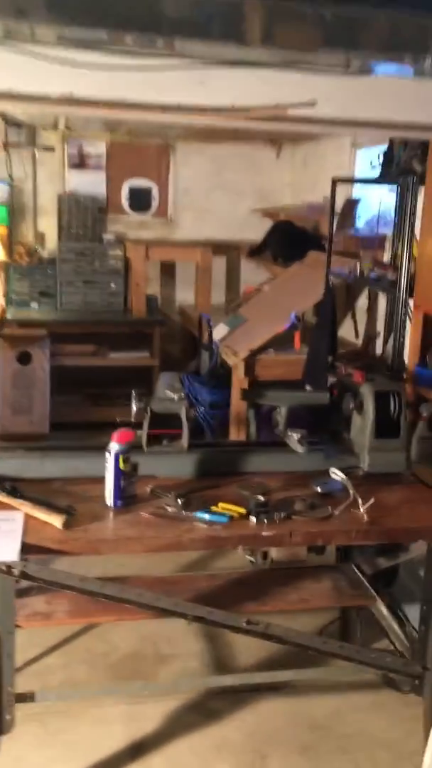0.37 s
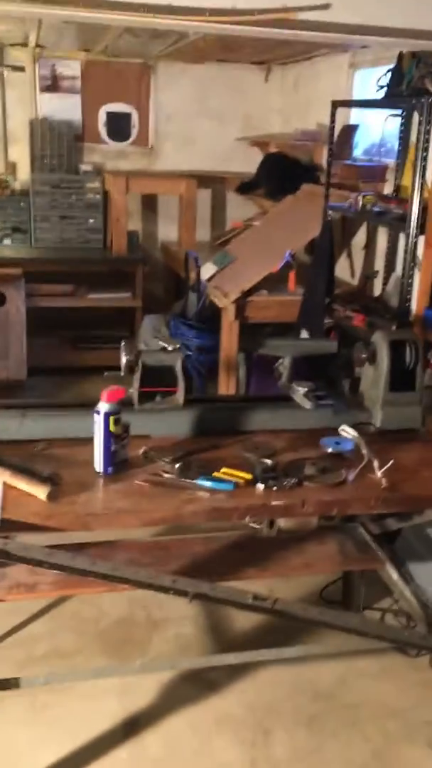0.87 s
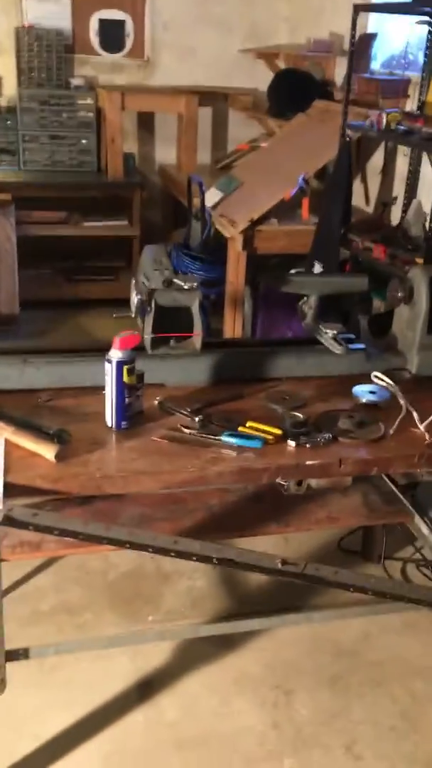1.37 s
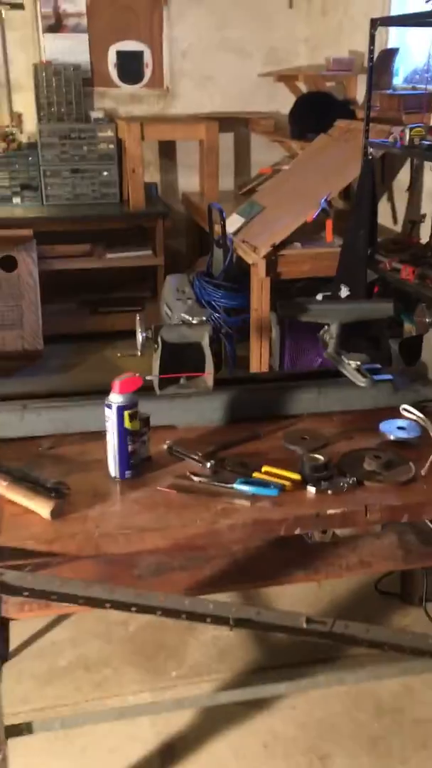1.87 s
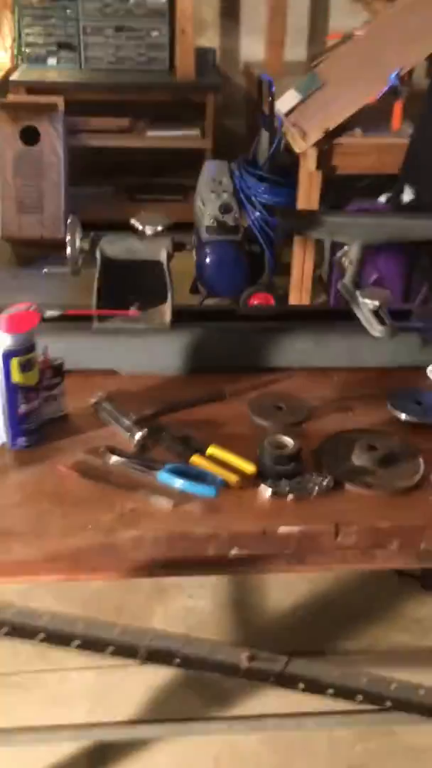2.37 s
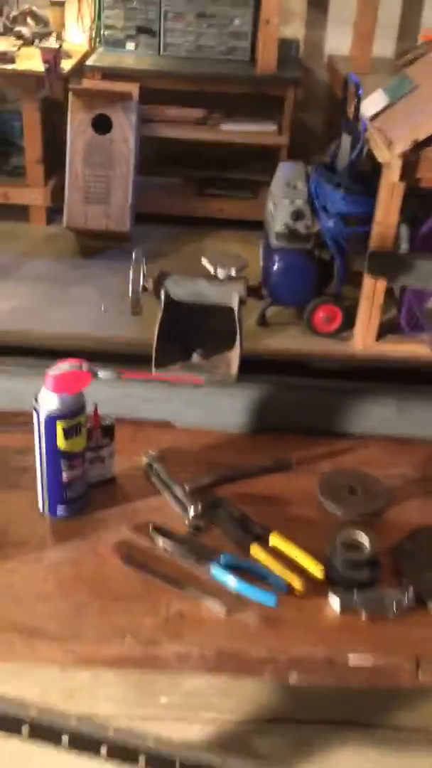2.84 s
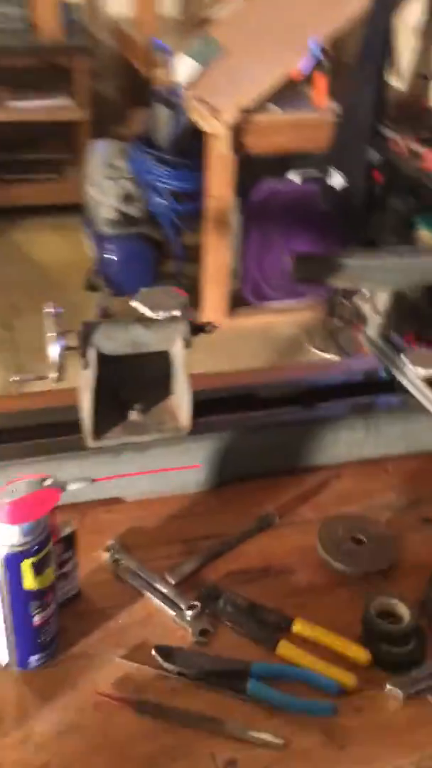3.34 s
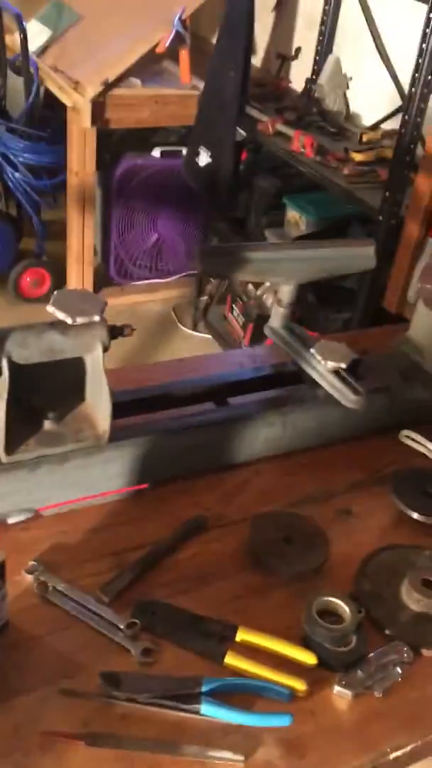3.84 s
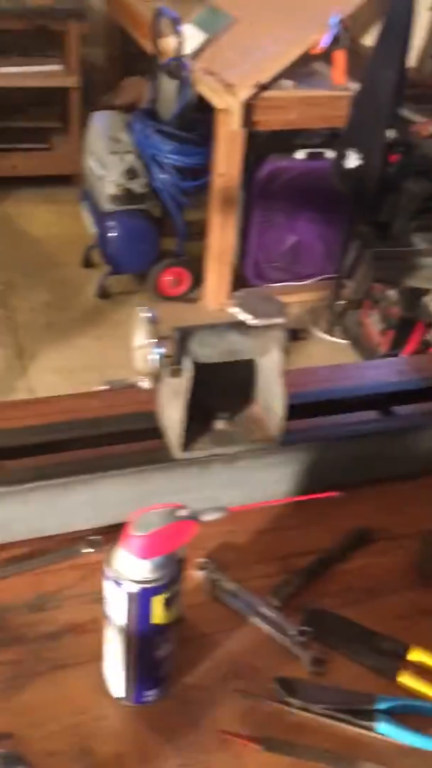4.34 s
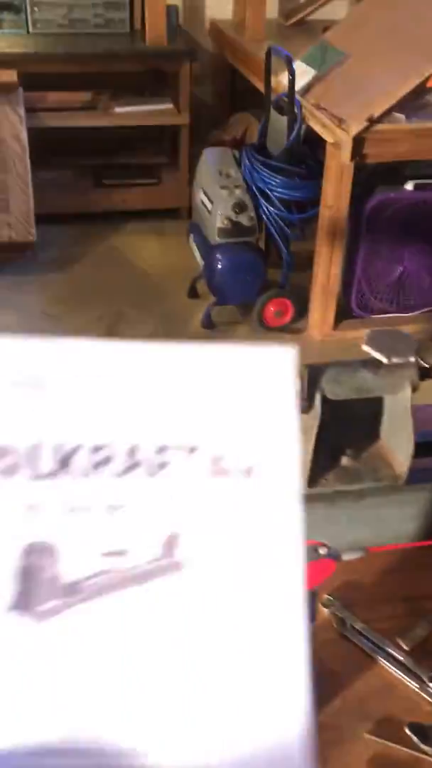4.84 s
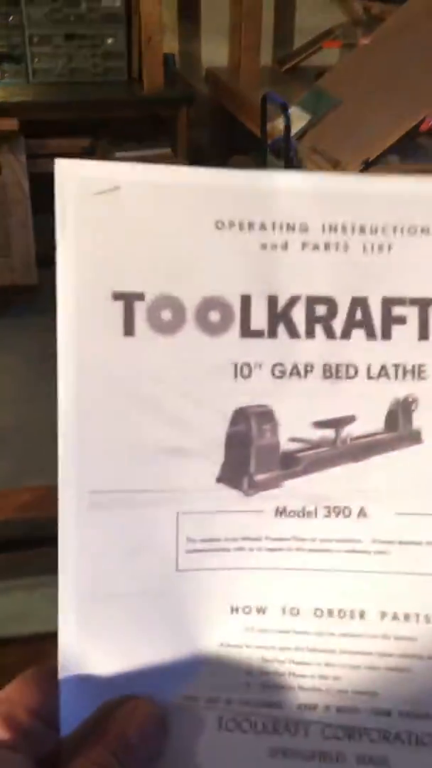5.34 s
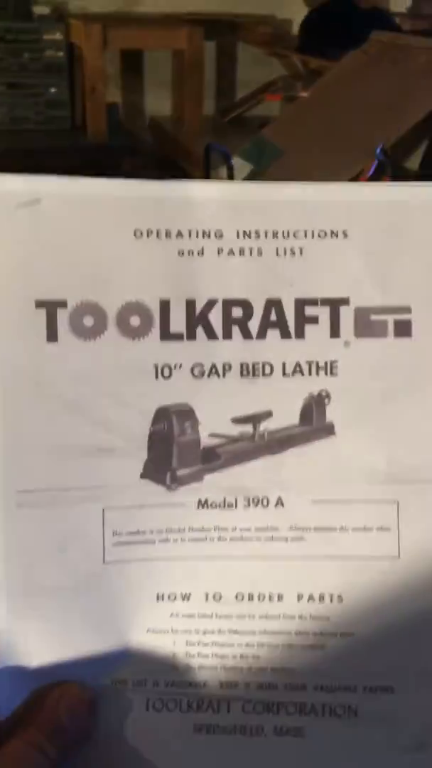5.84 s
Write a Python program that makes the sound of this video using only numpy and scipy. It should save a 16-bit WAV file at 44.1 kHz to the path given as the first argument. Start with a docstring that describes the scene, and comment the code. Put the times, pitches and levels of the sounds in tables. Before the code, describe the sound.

Close handheld microphone in a quiet workshop with short wall echoes. Faint hiss, low machine hum and a tiny rapid tick run throughout. A hand rubs and thumps softly, wood clatters briefly, then paper snaps and slides get busier, peaking in a sharp snap and hard bench knocks just after four seconds. Afterwards only a few light creases and snaps remain.

```python
"""A sheet flicks and a hand rubs the phone it holds, over microphone hiss and a machine behind the walls.
Someone walks through a quiet workshop, the phone in one hand and a few printed sheets in the other.
Fingers and heels thump, wood clatters, paper slides, snaps and creases, and blows ring a bench.
Shaped noise makes rubbing, paper and background; damped swings make snaps and thumps; decaying modes
make wood and bench. Paper, pops, wood and bench also reach the walls; hand, creases and tick stay close."""
import sys
import numpy as np
from scipy import signal
from scipy.fft import rfft, irfft
from scipy.io import wavfile
from scipy.ndimage import uniform_filter1d

SR = 44100
rng = np.random.default_rng(int(sys.argv[2]) if len(sys.argv) > 2 else 0)


def voltage_ratio(level):
    """Linear amplitude factor for a level in decibels (scalar or array-like)."""
    return 10 ** (np.asarray(level, float) / 20)


def wav_out(sig):
    """Save sig, one row per channel (or a flat mono array), as 16-bit PCM at SR to the path in sys.argv[1]."""
    wavfile.write(sys.argv[1], SR, np.round(np.clip(np.atleast_2d(sig).T, -1, 1) * 32767).astype(np.int16))


N = 262836
T = np.arange(N) / SR  # s

# All levels but the tick's are ahead of the microphone's colour; the tick joins after it.
# spectrum of the resting room and microphone: pitch_hz, relative level_db per Hz
STILL_SPECTRUM = [(20, -43), (30, -33), (45, 0.5), (60, 1.5), (87, -26.5), (190, -37), (300, -8),
                  (480, -57), (540, -14.5), (1040, -19.5), (2200, -22.5), (5100, -26), (9200, -29.5),
                  (13500, -30.5), (16000, -37)]
# resonances of the distant machine: pitch_hz, width_hz, level_db before wavering
MACHINE_DRONE = [(60.6, 5.2, -79.5), (270.3, 17, -72.5), (394.2, 13.8, -71.5), (1042, 54, -82)]
# grip rubbing of the hand on the phone: time_s, level_db
GRIP_LEVEL = [(0, -59.5), (.4, -59.5), (.51, -65), (1.3, -67.5), (1.8, -74), (2.0, -72), (2.27, -61.5),
              (2.62, -72.5), (3.13, -61.5), (3.4, -66), (4.0, -65), (4.2, -82), (4.35, -62), (4.8, -67.5),
              (5.37, -68.5), (5.63, -74.5), (5.96, -76.5)]
# low swells: jolts of the arm, and brief swellings of the machine's drone near 370 Hz:
# start_s, length_s, level_db before the swell, centre_khz, width_octaves
LOW_SWELLS = [(.16, 0.063, -48.5, 0.16, 1.58), (.17, 0.068, -46, 0.054, 1.6),
              (.72, 0.053, -54.5, 0.05, 0.72), (2.09, 0.057, -52, 0.055, 1.3), (2.13, 0.081, -58, 0.42, 2),
              (2.75, .03, -62, 0.36, 0.37), (2.9, 0.036, -59, 0.38, .51), (3.17, 0.021, -53, 0.374, 0.32),
              (4.17, 0.022, -49.5, 0.089, 1.2), (4.29, 0.032, -52, .068, 0.62),
              (4.37, 0.039, -66, 0.38, 1.1)]
# a sheet flicked, sudden and fading; columns as LOW_SWELLS
PAPER_FLICKS = [(0, 0.087, -68, 1.4, 4.9), (.94, 0.013, -62, 5.6, 2.7), (2.095, 0.035, -63.5, 1.3, 4.9),
                (2.919, 0.051, -66, 1.08, 2), (3.188, 0.041, -60.5, 2.8, 2.8),
                (3.228, 0.0094, -60, 1.5, 0.36), (3.412, 0.018, -55, 0.9, 1.56),
                (3.666, 0.0075, -58.5, 1.8, 0.83), (3.99, 0.014, -55.5, 10.2, .9),
                (4.071, 0.035, -55.5, 3, 4.4), (4.532, 0.014, -69.5, 5.9, 1.4),
                (5.44, 0.0073, -70, 11, 2.2)]
# sliding paper and cloth, swelling gently; the long row at 4.38 is a held sheet flexing near 1 kHz; columns as
# LOW_SWELLS
GENTLE_STROKES = [(.08, 0.11, -64.5, 1.1, 1.76), (.162, 0.078, -69.5, 1.1, 5.5),
                  (1.576, 0.1, -72.5, 5.9, 2.3), (2.167, 0.04, -65.5, 0.55, 4.3),
                  (2.225, 0.077, -61, 3.2, 1.64), (2.33, .045, -68.5, 1.53, 1.8),
                  (3.041, 0.27, -63, 0.74, 5), (3.265, 0.038, -60, 1.3, 4.4), (3.736, 0.069, -56, 2.2, 4.4),
                  (3.823, 0.029, -67, 4.9, 0.52), (3.919, 0.12, -60.5, 3.1, 3.2),
                  (4.1, .06, -59.5, 1.56, 1.24), (4.155, 0.058, -55, 3.8, 2.5),
                  (4.38, 0.88, -72.5, 0.97, 0.89), (4.58, 0.033, -70.5, 4.2, 1.9)]
# sheets pulled ever faster, then stopped dead; columns as LOW_SWELLS
PAPER_PULLS = [(4.2, 0.076, -54, 5.1, 1.63), (4.22, 0.062, -57, 9.8, 0.52), (4.23, 0.048, -49.5, 1.84, 1.8)]
# decay of the workshop's echoes: pitch_hz, t60_s
ROOM_DECAY = [(100, 0.35), (500, 0.24), (2000, 0.29), (6000, 0.31), (15000, 0.13)]
# runs of the tick from inside the phone, with one skip between them: first_s, last_s
TICK_TIMES = [(.0357, 1.7), (1.7628, 5.96)]
# treble bands of the tick: pitch_hz, width_hz, level_db while it sounds
TICK_BANDS = [(6060, 680, -71), (13000, 6500, -70.5)]
# snaps of a buckling sheet: start_s, peak_db, pitch_hz, length_cycles, room_db relative to the direct sound
PAPER_SNAPS = [(.317, -51, 2000, 1.5, 0), (.4393, -49, 1700, 2, -4), (.465, -52, 3000, 1.5, -2),
               (.5517, -42.5, 1900, 2.7, -27), (.944, -55, 13000, 2.7, -6), (1.7947, -50.5, 3300, 4.7, -7),
               (2.0936, -35.5, 1180, 1.17, -0.5), (2.6313, -27, 4650, 1.83, -3),
               (2.739, -38.5, 5170, 1.25, 1.5), (2.7727, -46, 1810, 1.3, -0.5),
               (2.9185, -45, 1700, 1.6, -20), (3.0517, -44.5, 1500, 2.4, 2.5),
               (3.1895, -43.5, 6400, 12, -6), (3.2293, -36, 1700, 1.6, 3), (3.4113, -37.5, 3300, 0.9, 2),
               (3.6705, -48.5, 1900, 2.3, 9), (3.7385, -45, 1220, 0.84, 8), (3.8653, -40, 5500, 0.96, -15),
               (3.886, -34, 4400, 0.63, -3.5), (3.998, -36, 4460, 1.8, 2), (4.0741, -22.5, 5860, 1.65, -12),
               (4.275, -42, 3230, 6.2, -19), (4.5335, -52, 3000, 0.87, -6), (4.9703, -38.5, 1070, 1.9, -5),
               (5.236, -42, 1430, 1.6, -15)]
# soft low thumps of fingers and heels; columns as PAPER_SNAPS
SOFT_THUMPS = [(.416, -46, 166, 2.1, 2.5), (.438, -44, 330, 2.8, -1.5), (.5165, -31, 200, 1.62, -18),
               (.5515, -34, 363, 2.4, -28), (.554, -34, 134, 2.1, -36), (2.0935, -37.5, 350, 4.7, 0),
               (2.1, -40, 208, 1.6, -2.5), (2.117, -39, 303, 0.95, -13), (2.204, -46, 292, 4.8, -12),
               (3.164, -40.5, 405, 1.1, -6)]
# spectrum of the bare wooden contacts: pitch_hz, relative level_db per Hz
CLATTER_SPECTRUM = [(88, -44), (150, -15.5), (524, -9), (1120, -6.5), (1830, -15), (2980, -14.5),
                    (4950, -23), (9630, -28.5), (16000, -34)]
# ringing modes of the wooden things: pitch_hz, relative level_db, t60_s
WOOD_MODES = [(210, -5, 0.036), (333, -3, 0.047), (504, 2.5, 0.08), (562, -4, 0.065), (666, -9, 0.13),
              (850, -5.5, 0.031), (1094, -24, 0.076), (1250, -16, 0.033), (1500, -31, 0.022)]
# blows on the bench: start_s, relative strength_db, contact_ms
BENCH_BLOWS = [(4.1694, -17, 0.34), (4.1774, -18.5, 0.09), (4.2886, -22, 0.2), (4.2941, -24.5, 0.044),
               (4.2999, -31, 0.31), (4.3049, -20, 0.21)]
# ringing modes of the bench: pitch_hz, relative level_db, t60_s
BENCH_MODES = [(310, -12.5, 0.042), (500, -20, 0.025), (666, -13.5, 0.063), (722, -10, 0.053),
               (870, -6, 0.026), (940, -2, 0.028), (1104, 1.5, 0.026), (1192, 0, 0.034), (1460, -3.5, 0.02),
               (1700, -4.5, 0.052), (1900, 2, 0.021), (2340, 3.5, 0.0084), (2770, -3, 0.015),
               (3300, -1.5, .012), (4400, -11, 0.013)]
# a thumb creasing the sheet close to the phone, a short dry crackle; columns as LOW_SWELLS
THUMB_CREASES = [(4.9715, 0.0064, -57.5, 1.6, 4.5), (5.0062, 0.0066, -60.5, 2.1, 4.4),
                 (5.038, .006, -66, 2.2, 2.6), (5.254, 0.011, -67.5, 5.9, 2.2)]
# treble colour of the microphone port in the case: pitch_hz, level_db
MIC_PORT = [(2300, 0), (2700, -2), (3150, 3), (3600, 0), (9800, 0), (10400, -4), (10900, 0)]


def level(x, db):
    """Scale to an rms level."""
    return x * voltage_ratio(db) / np.sqrt(np.mean(x ** 2))


def band(x, lo_hz, hi_hz, order=2):
    """Band-pass, kept below half the sample rate."""
    sos = signal.butter(order, [lo_hz, min(hi_hz, .49 * SR)], "band", fs=SR, output="sos")
    return signal.sosfilt(sos, x)


def noise_band(hz, width_hz, order=2):
    """Steady noise around one pitch."""
    return band(rng.standard_normal(N), hz - width_hz / 2, hz + width_hz / 2, order)


def colour(x, points):
    """Filter x by (Hz, dB) points, joined along log frequency."""
    hz, db = np.transpose(points)
    f = np.maximum(np.arange(len(x) // 2 + 1) * SR / len(x), 1)
    gain = voltage_ratio(np.interp(np.log(f), np.log(hz), db))
    return irfft(rfft(x) * gain, len(x))


def walk(rate):
    """Wandering random values: held for 1 / rate s, then slewed twice; spread near 1."""
    k = int(SR / rate)
    held = np.repeat(rng.standard_normal(N // k + 1), k)
    return 1.3 * uniform_filter1d(uniform_filter1d(held, k), k)[:N]


def grains(rate, spread_db):
    """Scattered tiny contacts at a mean rate per second, most small, a few large."""
    hit, size, sign = rng.random((3, N))
    strength = voltage_ratio(-spread_db * np.log(1 - size))
    return (hit < rate / SR) * strength * np.sign(sign - .5)


def ring(modes, weights):
    """One blow's answer of a body; the weights tell how the struck spot couples to each mode."""
    t = T[:SR // 4]
    out = np.zeros(len(t))
    for weight, (hz, db, t60) in zip(weights, modes):
        out += weight * voltage_ratio(db) * np.sin(2 * np.pi * hz * t) * 1000. ** (-t / t60)
    return out


def strokes(table, rise_share, fall_share, rub):
    """Each row opens a band of the given noise: it swells, holds to the end of its length and dies away."""
    out = np.zeros(N)
    for s, length, db, khz, octaves in table:
        rise, fall = rise_share * length, fall_share * length
        k = int(s * SR)
        u = T[:min(int((length + 6 * fall) * SR), N - k)]
        shape = np.minimum(u / rise, 1) * np.exp(-np.maximum(u - length, 0) / fall)
        edge = 2 ** (octaves / 2)
        opened = band(rub[k:k + len(u)], 1000 * khz / edge, 1000 * khz * edge)
        out[k:k + len(u)] += shape * level(opened, db)
    return out


def room(x):
    """Diffuse echoes off the workshop walls: a quick build-up, then each octave dies at its own rate."""
    t = T[:SR // 2]
    hz, t60 = np.transpose(ROOM_DECAY)
    tail = np.zeros(len(t))
    for f in 125 * 2. ** np.arange(8):
        octave = band(rng.standard_normal(len(t)), f / 2 ** .5, f * 2 ** .5)
        tail += octave * 1000. ** (-t / np.interp(np.log(f), np.log(hz), t60))
    tail = tail * (1 - np.exp(-t / 0.00067))
    return signal.fftconvolve(x, tail / np.sqrt(np.sum(tail ** 2)))[:N]


def still():
    """Broad room tone and microphone hiss, with the wavering resonances of a distant machine."""
    out = level(colour(rng.standard_normal(N), STILL_SPECTRUM), -68)
    for hz, width_hz, db in MACHINE_DRONE:
        out += level(noise_band(hz, width_hz, order=1), db) * voltage_ratio(2 * walk(3.56))
    return out


def hand_and_low_swells():
    """The grip shakes the phone and rubs its case, the arm jolts it, the drone swells: none sent to the room."""
    shake_db, shake_per_grip, grip_usual_db = -66.5, 0.25, -65  # shaking at the usual grip; dB per dB of grip
    grip_db = np.interp(T, *np.transpose(GRIP_LEVEL))
    shake = level(band(rng.standard_normal(N), 38, 91.4), shake_db)
    shake = shake * voltage_ratio(shake_per_grip * (grip_db - grip_usual_db))
    uneven_rub = rng.standard_normal(N) * voltage_ratio(2.2 * walk(50))
    grip = level(band(uneven_rub, 171, 452), 0) * voltage_ratio(grip_db)
    low_swells = strokes(LOW_SWELLS, 0.1, 0.71, rng.standard_normal(N))
    return shake + grip + low_swells


def rustle():
    """Dense rough contacts, some larger cracks, in patches that come and go; one long row is a held sheet
    flexing."""
    rub = level(grains(4000, 1.5), 0) + 1.28 * rng.standard_normal(N)
    rub = rub * voltage_ratio(3.23 * walk(70))
    edges = 300 * 2 ** np.arange(0, 6.1, .4)  # Hz
    patches = np.zeros(N)
    for lo_hz, hi_hz in zip(edges[:-1], edges[1:]):
        patches += band(rub, lo_hz, hi_hz, order=1) * voltage_ratio(2 * walk(40))
    # rise and fall as shares of each length
    flicks = strokes(PAPER_FLICKS, 0.05, 1, patches)
    gentle = strokes(GENTLE_STROKES, 0.27, 0.63, patches)
    pulls = strokes(PAPER_PULLS, 1, 0.15, patches)
    return flicks + gentle + pulls


def tick():
    """Faint millisecond puffs of treble noise from inside the phone, on a steady clock that skips once."""
    period_s, puff_s = .05, .0012
    gate = np.zeros(N)
    for first, last in TICK_TIMES:
        gate += (T >= first) * (T < last) * ((T - first) % period_s < puff_s)
    return gate * sum(level(noise_band(hz, width_hz), db) for hz, width_hz, db in TICK_BANDS)


def pops(table):
    """Snaps or thumps, each one short damped swing; returns the direct sound and what it sends into the room."""
    near, far = np.zeros((2, N + SR))
    t = T[:SR // 20]
    for s, db, hz, cycles, room_db in table:
        swing = np.sin(2 * np.pi * hz * t) * t ** 2 * np.exp(-t * hz * 8 / cycles)
        swing = voltage_ratio(db) * swing / np.max(np.abs(swing))
        k = int(s * SR)
        near[k:k + len(t)] += swing
        far[k:k + len(t)] += voltage_ratio(room_db) * swing
    return near[:N], far[:N]


def clatter():
    """Wooden things tumble together: a quick swell of contacts, as bare cracks and through the ring of wood."""
    start_s, rise_s, fall_s = 1.377, 0.011, 0.023
    cracks_db, contacts_db = -33, -55.5  # both before the swell
    u = np.maximum(T - start_s, 0)
    swell = np.minimum(u / rise_s, 1) * np.exp(-np.maximum(u - rise_s, 0) / fall_s)
    contacts = grains(1400, 0.96)
    rough = contacts + 1.6 * rng.standard_normal(N)
    cracks = level(colour(rough, CLATTER_SPECTRUM), cracks_db) * swell
    answer = ring(WOOD_MODES, (-1) ** np.arange(len(WOOD_MODES)))
    wood = signal.fftconvolve(level(contacts, contacts_db) * swell, answer)[:N]
    return cracks + wood


def bench():
    """Blows and their bounces, each on another spot; a harder contact is a shorter push, reaching higher modes."""
    # the last blow chatters on, weaker each time
    bounces, gap_s, first_db, drop_db, bounce_contact_ms = 5, .0056, -24, 3.1, 0.17
    bench_db, buzz_db, buzz_fall_s = -5, 0.5, 0.0085
    out = np.zeros(N + SR)
    t = T[:SR // 4]
    blows = list(BENCH_BLOWS)
    last_s = blows[-1][0]
    for n, (late, soft) in enumerate(rng.standard_normal((bounces, 2))):
        bounce_s = last_s + (n + 1 + .1 * late) * gap_s
        blows.append((bounce_s, first_db - n * drop_db, bounce_contact_ms * 2 ** soft))
    spots = rng.standard_normal((len(blows), len(BENCH_MODES)))
    for (s, db, contact_ms), spot in zip(blows, spots):
        push = t[:400] * np.exp(-1000 * t[:400] / contact_ms)
        answer = ring(BENCH_MODES, np.sign(spot) * voltage_ratio(1.4 * spot))
        # the loose sheets buzz for a moment after each blow
        buzz = voltage_ratio(buzz_db) * rng.standard_normal(len(t)) * np.exp(-t / buzz_fall_s)
        sound = signal.fftconvolve(push / push.sum(), answer + buzz)
        k = int(s * SR)
        out[k:k + len(sound)] += voltage_ratio(db + bench_db) * sound
    return band(out[:N], 280, 5300)


def creases():
    """Short bursts of cracks that stop dead, too near and faint to wake the room."""
    crackle = level(grains(2600, 2.5), 0) + 0.45 * rng.standard_normal(N)
    return strokes(THUMB_CREASES, .12, 0.13, crackle)


def scene():
    """Near sounds, their echoes from the workshop walls, and the background."""
    background, low, strokes_heard = still(), hand_and_low_swells(), rustle()
    snaps, snaps_far = pops(PAPER_SNAPS)
    thumps, thumps_far = pops(SOFT_THUMPS)
    wood, knocks = clatter(), bench()
    sent = snaps_far + thumps_far + voltage_ratio(-5.5) * strokes_heard + voltage_ratio(-5.5) * wood + voltage_ratio(-11) * knocks
    direct = low + strokes_heard + snaps + thumps + wood + knocks + creases()
    return (background + direct + room(sent))[None]


def band_limit(x):
    """A steep low-pass at the top of the band."""
    return signal.sosfilt(signal.butter(12, 16350, fs=SR, output="sos"), x)


def record(dry):
    """The phone's microphone port colours the treble, its own tick joins in and the top is cut."""
    picked_up = colour(dry[0], MIC_PORT)[None] + tick()
    top_cut = signal.ellip(10, .2, 70, 15800, fs=SR, output="sos")  # low-pass: ripple dB, stop dB, Hz
    mix = signal.sosfilt(top_cut, picked_up)
    return band_limit(mix)


dry = scene()
out = record(dry)
wav_out(out)
```